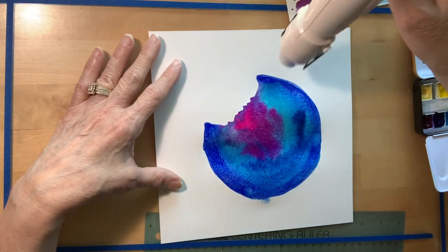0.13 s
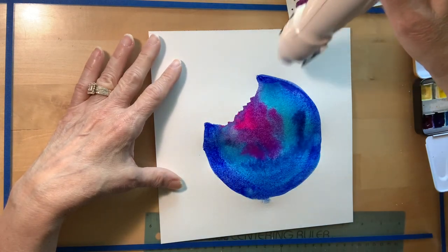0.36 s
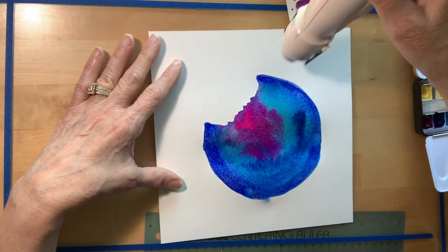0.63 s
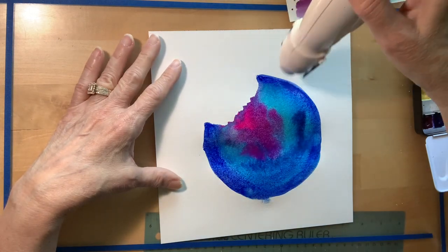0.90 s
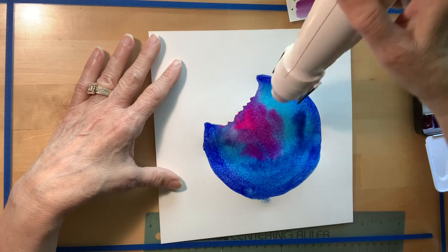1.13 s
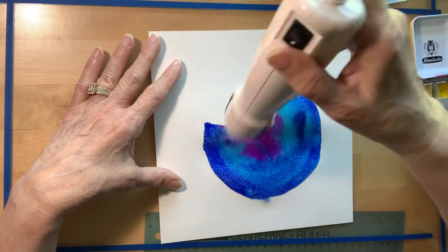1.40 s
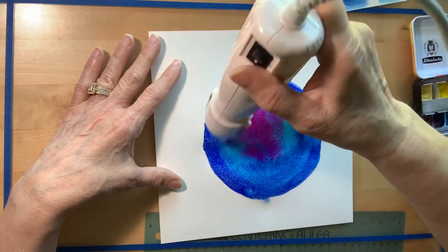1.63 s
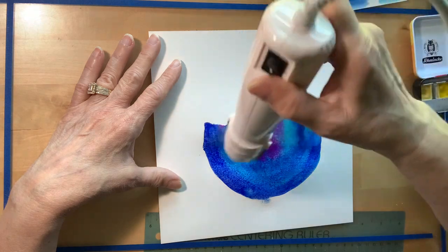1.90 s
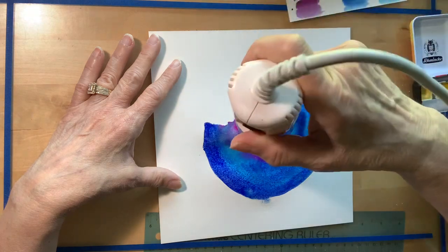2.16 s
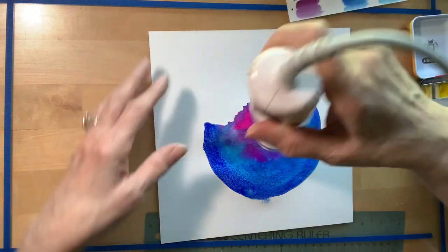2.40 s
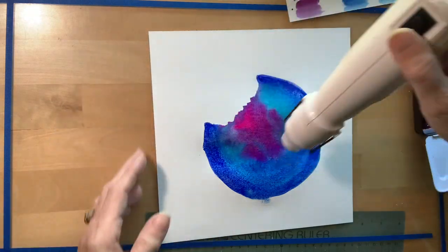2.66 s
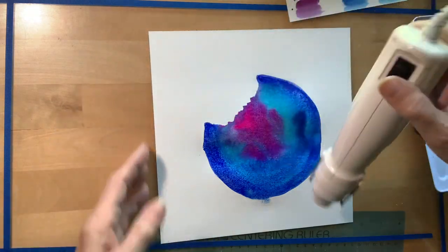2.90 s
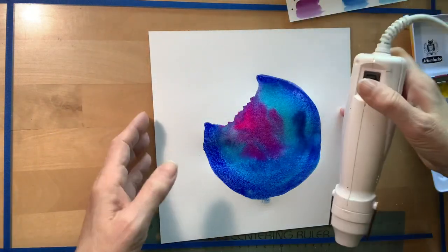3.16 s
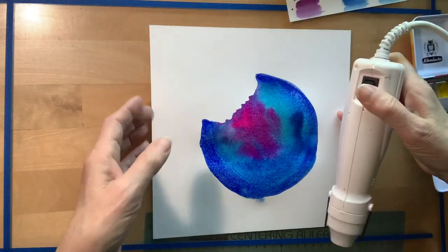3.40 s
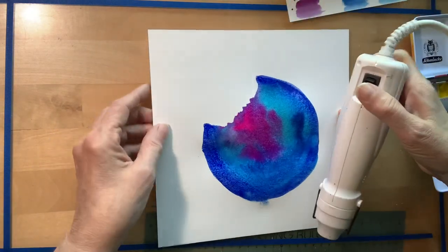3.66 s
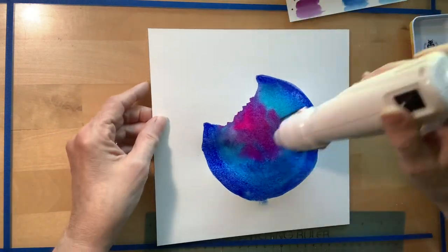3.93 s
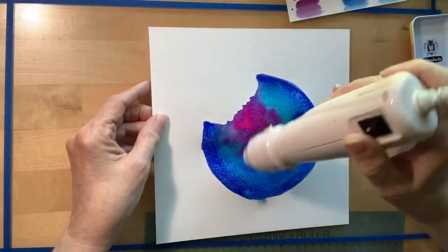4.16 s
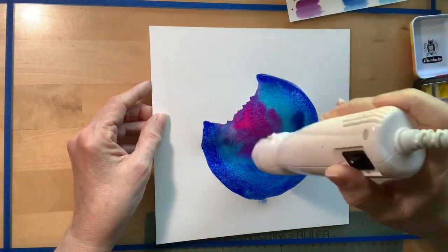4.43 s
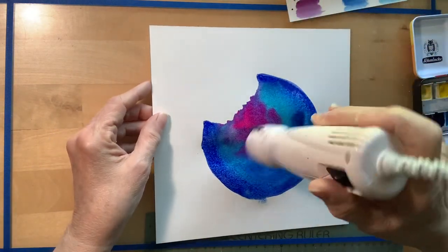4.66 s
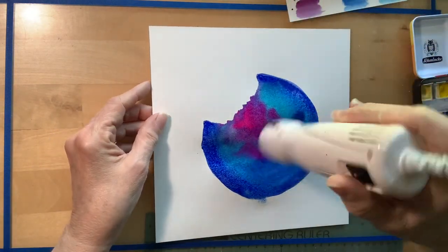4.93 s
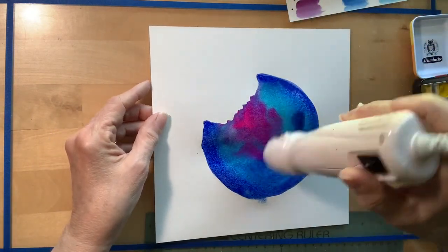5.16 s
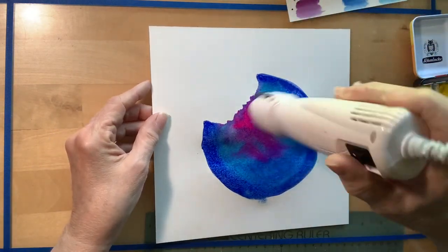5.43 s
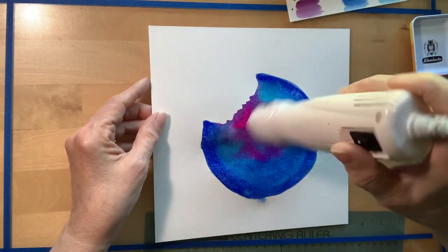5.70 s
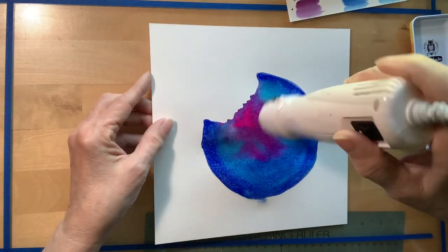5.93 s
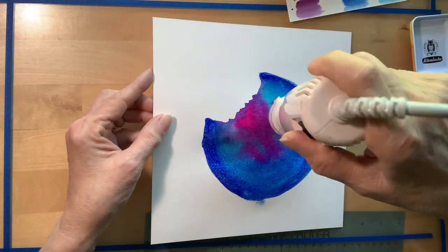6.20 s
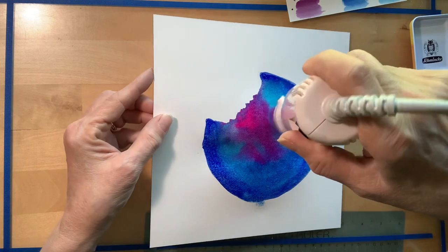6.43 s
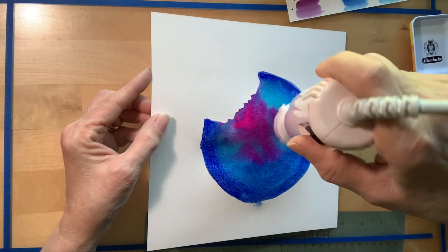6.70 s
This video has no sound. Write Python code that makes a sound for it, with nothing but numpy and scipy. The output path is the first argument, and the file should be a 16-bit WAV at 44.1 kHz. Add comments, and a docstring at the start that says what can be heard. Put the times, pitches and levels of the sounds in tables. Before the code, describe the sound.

A small heat gun is already running and never stops. Its breathy rush of air, hollow as if through a short tube, carries a buzzy motor whine that flutters six or seven times a second. Moving over paper recolours the air; around three seconds the gun swings aside and the whine turns smoother and slightly higher, then it returns. Close stereo microphone, indoor room, faint low hum.

```python
"""A steady breathy rush with a rippling, throbbing whine inside it, over a low room hum: a small handheld heat
gun running over a sheet of paper on a table, close under a two-port microphone. The rush is coloured noise, air
through a resonant barrel; the motor is a set of sines at multiples of the shaft speed, rippled by the mains; the
hum is a few low wavering tones. Moving the gun from far, over the paper, aside and back recolours the rush and
swells or cancels single orders."""
import sys
import numpy as np
from scipy import signal
from scipy.io import wavfile
from scipy.ndimage import uniform_filter1d

SR = 44100
rng = np.random.default_rng(int(sys.argv[2]) if len(sys.argv) > 2 else 0)


def gain_from_db(level_db):
    """Convert decibel levels to linear amplitude factors (20 dB per decade)."""
    decades = np.asarray(level_db, float) / 20
    return 10 ** decades


def log_audio(samples):
    """Write samples as a 16-bit WAV file to the path given in sys.argv[1]."""
    # one column per channel
    frames = np.atleast_2d(samples).T
    # limit to full scale, then quantise
    limited = np.clip(frames, -1, 1)
    pcm = np.round(limited * 32767).astype(np.int16)
    wavfile.write(sys.argv[1], SR, pcm)


N = 300762
STEP = 16  # samples per tick of the slow clock
T, SLOW = np.arange(N) / SR, np.arange(0, N, STEP) / SR  # s

# where the gun is held; the share left over is over the paper:
# (t/s, rush level/dB, share far away 0-1, share laid aside 0-1, treble lift/dB)
POSE = [(0.0, 0, 0.8, 0.22, -1), (0.9, 0.54, 0.88, 0.02, -1), (1.2, 0.3, 0.49, 0.05, -1.5),
        (1.6, 1, 0.19, 0.06, -1.5), (2.2, 0.7, 0.02, 0.21, -2.5), (2.7, -0.5, 0.08, 0.32, 0),
        (2.9, 0.3, 0.28, 0.67, 0), (3.06, -0.5, 0, 0.72, -1.5), (3.4, 0.8, 0, 0.96, -1.5),
        (3.76, 1.6, 0, 0.98, -2), (3.91, 1.0, 0.14, 0.38, -1.5), (4.25, -0.1, 0.01, 0.02, 0),
        (4.8, 0, 0.07, 0.18, 1), (5.6, 0, 0.12, 0.02, 0), (6.05, -0.2, 0.13, 0.02, -2),
        (6.3, 0.4, 0, 0.09, -5.5), (6.82, -0.5, 0.01, 0.0, -2.5)]


def evened(x):
    """Scales to unit power."""
    return x / np.sqrt(np.mean(abs(x) ** 2) + 1e-20)


def columns(rows, at, bend=lambda v: v):
    """Every column of a table read at the given places of its first column."""
    key, *values = np.transpose(rows)
    return np.array([np.interp(bend(at), bend(key), v) for v in values])


def by_hz(rows, hz):
    """Columns of a spectrum read on a log-frequency axis."""
    return columns(rows, hz, lambda v: np.log(v + 1))


def shares(t):
    """Weights of the three poses: far away, over the paper, laid aside."""
    far, aside = np.clip(columns(POSE, t)[1:3], 0, 1)
    far = np.minimum(far, 1 - aside)
    return np.array([far, 1 - far - aside, aside])


def wander(width_hz):
    """Complex low-passed chance of unit power, corner near width_hz, on the slow clock."""
    r = np.exp(-2 * np.pi * width_hz * SLOW[1])
    a, b = rng.standard_normal((len(SLOW), 2)).T
    return evened(signal.lfilter([1 - r], [1, -r], a + 1j * b))


def ports(lead, balance_db):
    """Complex gains of the two microphone ports: left leads by lead radians and is balance_db louder."""
    left_power = 1 / (1 + gain_from_db(-2 * balance_db))
    gains = np.sqrt(2 * np.array([left_power, 1 - left_power]))
    return gains * np.exp(.5j * np.array([lead, -lead]))


def tone(turn, shape):
    """A sine on the running angle, shaped in both ports by slow complex gains."""
    gains = np.repeat(shape, STEP, axis=1)[:, :N]
    start = 2 * np.pi * rng.random()
    return np.sqrt(2) * (gains * np.exp(1j * (turn + start))).real


def hum(balance_db=0.0):
    """Low tones of the room, wavering at random in strength and phase alike in both ports."""
    # low room tones: (f/Hz, level/dB before the halved wavering gain, waver width/Hz)
    room_tones = [(39, -64.5, 6), (61, -64.5, 1.4), (120, -68, 0.98)]
    place = ports(np.zeros(1), np.array([balance_db]))
    out = np.zeros((2, N))
    for hz, db, width_hz in room_tones:
        waver = (1 + wander(width_hz)) / 2
        out += tone(2 * np.pi * hz * T, gain_from_db(db) * waver * place)
    return out


def order_levels(weights):
    """Level in dB of every loud order: reflections swell or cancel it as the gun moves."""
    # multiples of the shaft speed that stand out, in the column order of the next table
    singers = (3, 4, 5, 7, 14, 17)
    # their swelling and fading: (t/s, then level/dB of each of those multiples)
    singing = [(0.0, -42.5, -49, -43.5, -36, -44, -48), (0.45, -41.5, -46, -44, -41, -41, -53),
               (1.05, -44, -48.5, -45, -37, -43.5, -48), (1.4, -38.5, -47, -39, -42, -42.5, -46),
               (1.95, -41, -48, -38, -38.5, -48, -59), (2.08, -40.5, -49, -38, -38.5, -55, -39.5),
               (2.3, -40, -47, -37, -38, -60, -33), (2.45, -37.5, -53, -39, -47, -50, -43),
               (2.8, -42, -39, -43, -39.5, -48, -52), (3.02, -54, -51, -49, -28.5, -42.5, -60),
               (3.2, -48, -54, -56, -31.5, -41, -49), (3.33, -43, -44, -58, -39, -62, -45),
               (3.65, -47, -61, -60, -36.5, -52, -46), (3.86, -37.5, -48, -39, -30, -52, -67),
               (4.0, -45, -50, -55, -46, -52, -51), (4.07, -45, -49, -46, -33, -46, -47),
               (4.22, -53, -51, -38, -32, -48, -43), (4.45, -42.5, -49, -41, -32, -56, -39.5),
               (5.2, -43, -50, -38, -33.5, -47, -44), (5.65, -44, -48, -37, -37.5, -44, -38.5),
               (6.0, -60, -44, -36.5, -33.5, -45, -42.5), (6.4, -41.5, -39, -40.5, -33.5, -50, -55),
               (6.82, -37, -39, -39, -31, -45, -45)]
    # other loud orders, before drift: (multiple, level/dB far away, over the paper, laid aside)
    steady = [(1, -49, -49.5, -46), (6, -45, -53, -43), (8, -48, -54, -48), (10, -41.5, -47.5, -50.5),
              (11, -54, -46.5, -47.5), (15, -56, -48, -47), (21, -61, -50, -56)]
    # brief swells and fades as the gun swings: (t/s, half length/s, multiple, level change/dB)
    swells = [(1.05, .15, 8, 3), (1.7, 0.36, 10, -11), (2.2, .25, 21, 5), (2.8, .08, 10, 8),
              (3.253, .2, 11, 5), (3.805, .07, 6, 6.5), (4.077, .12, 11, 8), (4.746, 0.11, 11, 8),
              (5.7, 0.35, 11, -5), (6.5, .35, 15, 6), (6.4, .3, 8, 4)]
    drift_db, drift_hz = 2, 1.2  # rms and width; reflections shift as the hand moves
    levels = dict(zip(singers, columns(singing, SLOW)))
    for k, *pose_db in steady:
        drift = np.sqrt(2) * wander(drift_hz).real
        # the drift grows with the multiple, full from 10 up
        levels[round(k)] = pose_db @ weights + drift_db * min(k / 10, 1) * drift
    for s, half_s, k, db in swells:
        levels[round(k)] = levels[round(k)] + db * np.exp(-((SLOW - s) / half_s) ** 2)
    return levels


def motor(rough_hz=12, faint_throb=0.43, faint_rough=0.2):
    """Shaft orders on one wavering speed: sines that throb together, a little smeared by chance."""
    # the fan runs freer when the nozzle points away from the paper: (t/s, shaft speed f/Hz)
    speed = [(0.0, 292.8), (0.5, 292.1), (1.0, 291.7), (1.5, 291.1), (2.3, 291.1), (2.75, 292.7),
             (3.3, 294.2), (3.6, 295.3), (3.9, 293.5), (4.07, 290.7), (4.6, 289.6), (4.9, 289.8),
             (5.5, 289.4), (5.9, 288.8), (6.35, 290.7), (6.82, 290.3)]
    # the whine throbs as the shaft slowly whirls in its bearing: (t/s, throbs so far)
    throbs = [(0, -.05), (2.18, 14.79), (3.93, 26.19), (4.8, 32.08), (5.67, 37.78), (6.83, 45.63)]
    # factor on the throb depth: (far away, over the paper, laid aside)
    throb_by_pose = (0.97, 1.37, 0.21)
    # extra deep throb of orders near one pitch, far away: (f/Hz, half width/Hz, depth 0-1, lag/rad)
    far_pulse = (2150, 350, .85, 1.45)
    # loud orders: (multiple, left-right level/dB far away, over the paper, laid aside, left port lead/rad
    # in the same three poses, roughness 0-1, throb depth 0-1 before the pose factor, throb lag/rad)
    loud_orders = [(1, 4, 2, 2.5, 0.2, 0.14, 0.5, 0.013, 0.022, .1),
                   (3, -40, -4, -4, 1.8, 1.1, -2, 0.72, 0.25, .1),
                   (4, 6, 1, -3, 1.7, -0.5, 0.5, 0.074, 0.69, 3.35),
                   (5, 10, -3, 5, 1.7, 0.7, 1.5, 0.054, 0.13, 1.6),
                   (6, 19, 12, -2.2, -3, 5, -1.5, 0.13, 0.043, 2.9),
                   (7, 9, -10, -8, -2, 0.4, -2, 0.094, 0.12, 3.1),
                   (8, -1, .1, 3, -4, -2.5, -8, 0.36, .15, 1.2),
                   (10, 12, -5, 1, -2, -1.5, -1.5, 0.1, 0.066, 0.98),
                   (11, 10, -6, -8, -0.2, 2.24, -2.5, 0.19, 0.25, 3.7),
                   (14, -5, -1, 2, 1, -1, 0.5, 0.14, 0.2, 0.62),
                   (15, -3, .1, -2.2, 0, 0.7, 1, 0.18, 0.23, .1),
                   (17, 4, -2, -1, -1.5, 1.6, -13.5, 0.15, 0.35, 0.34),
                   (21, -3, 0, -4, 4, -0.5, 9, 0.13, 0.29, .1)]
    # faint orders, before roughness and throb:
    # (multiple, level/dB far away, over the paper, laid aside, left port lead/rad)
    faint_orders = [(2, -52, -57, -56, -1), (9, -49, -61, -54.5, -1.5), (12, -52, -50.5, -64, 1.65),
                    (13, -54, -55, -54, 6), (16, -66, -52, -58, 2.5), (18, -51, -70, -50, 4.5),
                    (19, -54, -52, -65, 1), (20, -61, -56, -61, -1.5), (22, -72, -59, -63, -8.5),
                    (25, -69, -56, -61, -1.6), (26, -67, -56, -62, -2.5), (27, -65, -72, -60, -0.5),
                    (30, -58, -63, -57, -6), (31, -58, -56, -59, -3), (32, -56, -51, -62, -3),
                    (36, -59, -66, -65, 3.5), (38, -68, -53.5, -57, 4.5), (39, -63, -73, -58, -1.5),
                    (43, -56, -59, -62, 1)]

    speed_hz = columns(speed, SLOW)[0] + 0.12 * wander(width_hz=2.73).real
    turn = 2 * np.pi * np.cumsum(np.interp(T, SLOW, speed_hz)) / SR
    weights = shares(SLOW)
    throb = 2 * np.pi * columns(throbs, SLOW)[0]
    throb_strength = throb_by_pose @ weights
    # rectified mains shakes torque and speed: a side tone 120.5 Hz above and below each order
    shake = np.exp(2j * np.pi * 120.5 * SLOW)
    ripple = 1 + 0.2 * shake - 0.065 / shake

    levels_db = order_levels(weights)
    pulse_hz, pulse_width_hz, pulse_depth, pulse_lag = far_pulse
    out = np.zeros((2, N))
    for k, *side, rough, depth, lag in loud_orders:
        body = 1 + np.sqrt(abs(rough)) * wander(rough_hz)
        body += depth * throb_strength * np.cos(throb - lag)
        near = np.exp(-((k * speed_hz.mean() - pulse_hz) / pulse_width_hz) ** 2)
        body += near * pulse_depth * weights[0] * np.cos(throb - pulse_lag)
        place = ports(side[3:] @ weights, side[:3] @ weights)
        out += tone(round(k) * turn, gain_from_db(levels_db[round(k)]) * body * ripple * place)
    for k, *pose_db, lead in faint_orders:
        body = 1 + np.sqrt(faint_rough) * wander(rough_hz)
        body += faint_throb * throb_strength * np.cos(throb)
        place = ports(np.array([lead]), np.zeros(1))
        out += tone(round(k) * turn, gain_from_db(pose_db @ weights) * body * ripple * place)
    return out


def rush(echo_db=3.0, patchy_db=0.6, tilt_hz=6000, nozzle_width_hz=220, lowest_hz=33):
    """Turbulent air through the barrel: noise coloured by the pose and by echoes, with drifting patches."""
    # broad colour: (f/Hz, level/dB per Hz far away, over the paper, laid aside), before the changes below
    broad_colour = [(25, -76, -85, -93), (60, -85.5, -81.5, -82.5), (228, -84, -81.5, -81),
                    (260, -77.5, -74, -73), (404, -69, -70, -68.5), (560, -70, -66.5, -64),
                    (686, -68.5, -75.5, -59), (749, -60, -59.5, -70), (1055, -67, -61.5, -69.5),
                    (1223, -70, -73, -70), (1595, -69.5, -60, -69.5), (1830, -65.5, -65, -66.5),
                    (2060, -62, -59, -70.5), (2290, -67.5, -62.5, -70), (2700, -76, -67.5, -74.5),
                    (3300, -71.5, -73, -73.5), (4260, -70, -72, -76), (4900, -68, -68, -65),
                    (5600, -75, -71.5, -78), (7150, -75, -75, -75.5), (9100, -71, -75, -76),
                    (12300, -76.5, -74, -79.5), (15500, -79, -79.5, -81)]
    # narrow lifts and dips from table and paper:
    # (f/Hz, half width/Hz, level change/dB far away, over the paper, laid aside)
    comb = [(568, 20, 0, 5, -3), (763, 43, -11, 2, 3), (1047, 35, -5.5, 5.5, 9), (1071, 24, -3, -3.5, -1),
            (1634, 35, -10, 1.5, 3), (1880, 82, -1, -2.5, 0.5), (1964, 98, 2, -3.5, 0),
            (2330, 70, 4.5, 2, 9), (2410, 78, 12, 0.5, -22), (3050, 42, 6, 3.5, 6), (3390, 80, 1, -2, -2.5),
            (4030, 45, 2, 2, 4), (4270, 73, -7, -2.5, 13.5), (5200, 50, 2, -9, -14)]
    # breathy band the nozzle points at the microphone while tilted; end values hold outside:
    # (t/s, f/Hz, level change/dB)
    nozzle = [(4.0, 4900, -4), (4.3, 4946, 3), (6.0, 4900, 2.5), (6.3, 4503, 3), (6.82, 4600, 0.5)]
    # (f/Hz, left-right level/dB far away, over the paper, laid aside)
    balance = [(60, 1, 1.5, 1), (250, 1, 2, 0), (400, -1.5, 0.5, 3), (600, 6, 0.5, 2), (720, 6, -0.5, 0),
               (880, 8, -4, 16), (1190, -7, 0.5, -5), (1560, -7, -8, -1), (1790, -5, 5, -3),
               (2100, -0.5, -4, -4), (2900, -3, 2.5, 10), (4100, 0.5, -1.5, -.8), (6000, 0, 0.3, 0.3)]
    # (f/Hz, left port lead/rad)
    port_lead = [(0, 0), (1290, -0.85), (2070, -1.0), (2330, -2), (3010, -1.5), (3450, -6.0), (3700, -6),
                 (6290, -7.5), (8100, -8.5), (8350, -9), (10900, -9.5), (12700, -11.5), (13300, -11.5),
                 (16500, -14)]
    # (f/Hz, how alike the two channels are 0-1); nearly one signal at 8.4-10.9 kHz and from 13.6 kHz up
    likeness = [(60, 0.99), (400, 0.96), (680, 0.8), (800, 0.92), (1800, 0.79), (3000, 0.48), (4000, 0.78),
                (5500, 0.62), (7500, 0.7), (8400, 1), (10900, 0.96), (11700, 0.62), (13000, .8), (13600, 1)]

    noise = rng.standard_normal((N, 2)).T
    hz, t, (one, other) = signal.stft(noise, SR, nperseg=2048, noverlap=1536)
    weights = shares(t)
    level_db, _, _, treble_db = columns(POSE, t)
    flicker = evened(uniform_filter1d(rng.standard_normal(len(t)), size=6))
    treble_db = treble_db + 0.67 * flicker  # the treble flickers quickly

    # patches are broad in pitch and brief; echoes are narrow in pitch and slow
    chance = rng.standard_normal((len(t), 2 * len(hz))).T
    patches = uniform_filter1d(chance[1::2], size=12, axis=0)
    patches = evened(uniform_filter1d(patches, size=4, axis=1))
    echoes = uniform_filter1d(chance[::2], size=2, axis=0)
    echoes = evened(uniform_filter1d(echoes, size=50, axis=1))

    colour_db = by_hz(broad_colour, hz)
    for at, width, *db in comb:
        colour_db += np.outer(db, np.exp(-((hz - at) / width) ** 2))
    colour_db -= 10 * np.log10(1 + (lowest_hz / (hz + 1)) ** 12)  # steep fall below the lowest rumble
    treble_shelf = hz ** 2 / (hz ** 2 + tilt_hz ** 2)
    field_db = colour_db.T @ weights + level_db + np.outer(treble_shelf, treble_db)
    nozzle_hz, nozzle_db = columns(nozzle, t)
    field_db += nozzle_db * np.exp(-((hz[:, None] - nozzle_hz) / nozzle_width_hz) ** 2)
    field_db += patchy_db * patches + echo_db * echoes
    # the random swings leave the mean amplitude alone
    field_db -= np.log(10) / 20 * (patchy_db ** 2 + echo_db ** 2) / 2

    alike = np.clip(by_hz(likeness, hz)[0], 0, 1)[:, None]
    pair = np.array([one, alike * one + np.sqrt(1 - alike ** 2) * other])
    lead = columns(port_lead, hz)[0][:, None] + 0 * t
    pair *= ports(lead, by_hz(balance, hz).T @ weights)
    air = pair * gain_from_db(field_db) * np.sqrt(SR / 2)  # from level per Hz to noise amplitude
    return signal.istft(air, SR, nperseg=2048, noverlap=1536)[1][:, :N]


def scene():
    """Rush, motor and room hum together at the microphone."""
    return rush() + motor() + hum()


def low_pass(x):
    """Removes everything above the highest recorded frequency."""
    return signal.sosfilt(signal.butter(12, 16990, fs=SR, output="sos"), x)


def record(dry):
    """Limits the band with a steep linear-phase low-pass at 15760 Hz."""
    edge = signal.firwin(1023, 15760, window=("kaiser", 10), fs=SR)
    mix = signal.oaconvolve(dry, edge[None], "same")
    return low_pass(mix)


dry = scene()
out = record(dry)
log_audio(out)
```